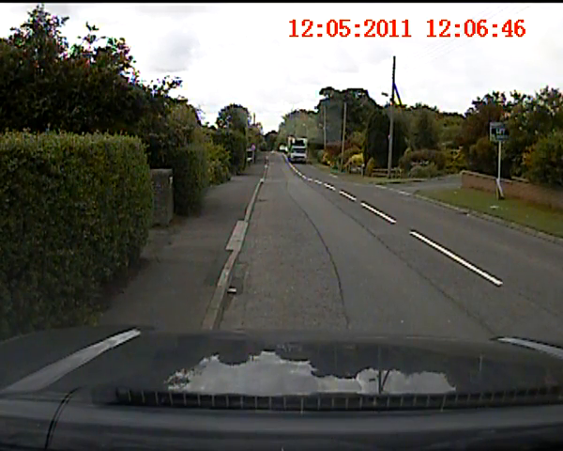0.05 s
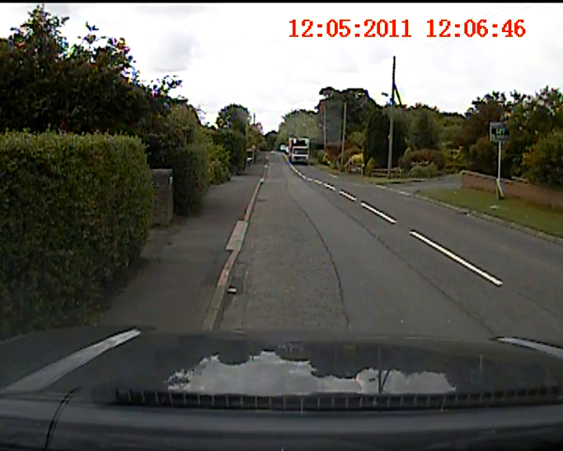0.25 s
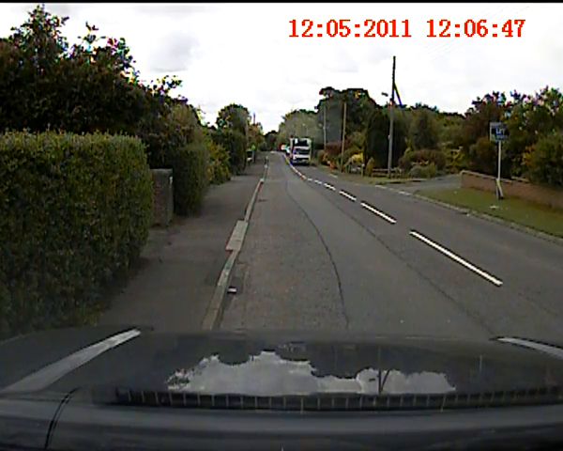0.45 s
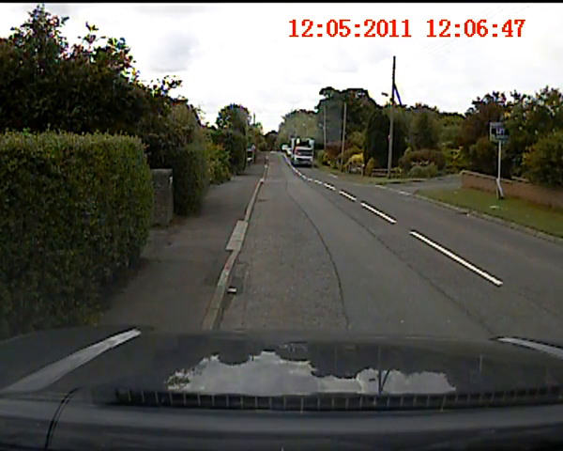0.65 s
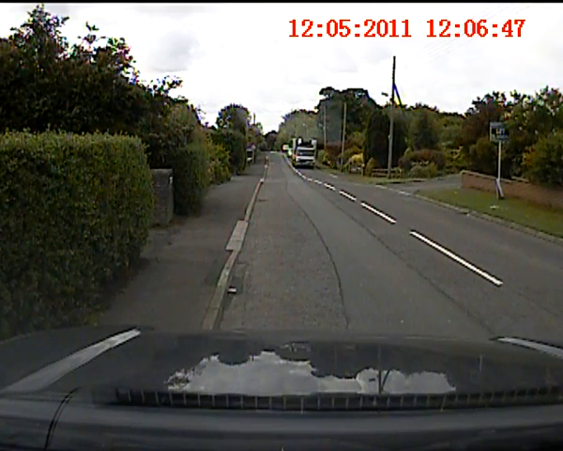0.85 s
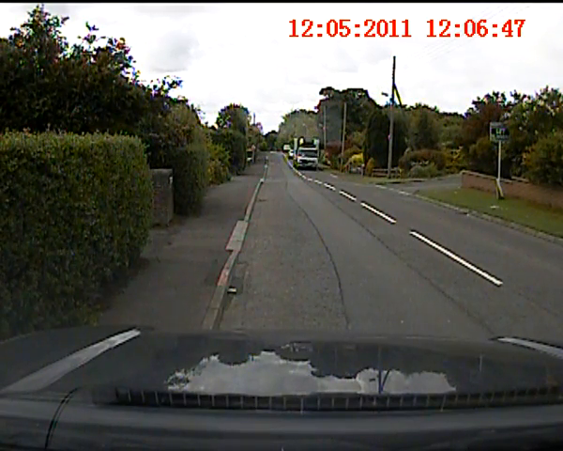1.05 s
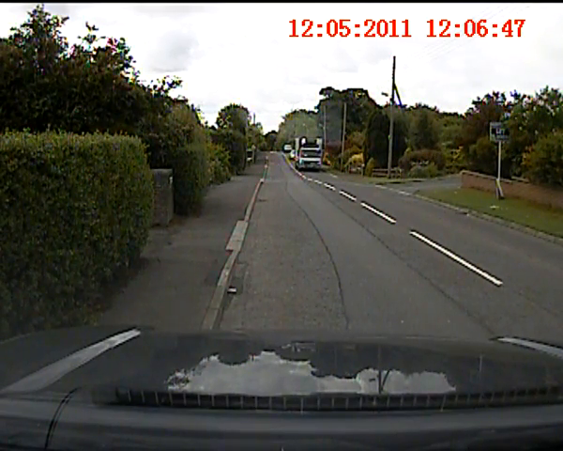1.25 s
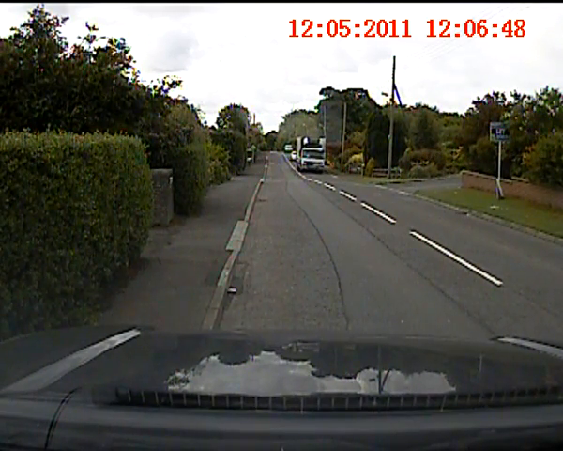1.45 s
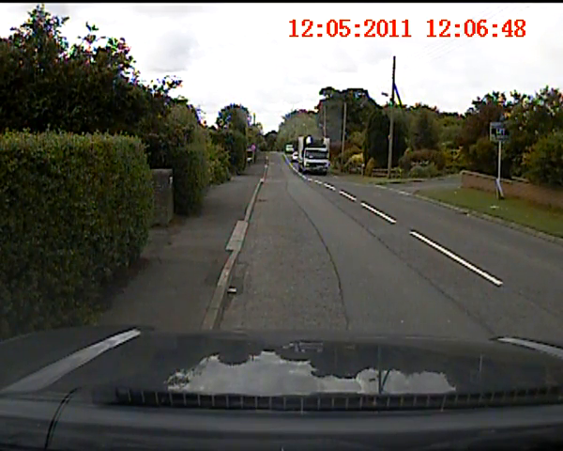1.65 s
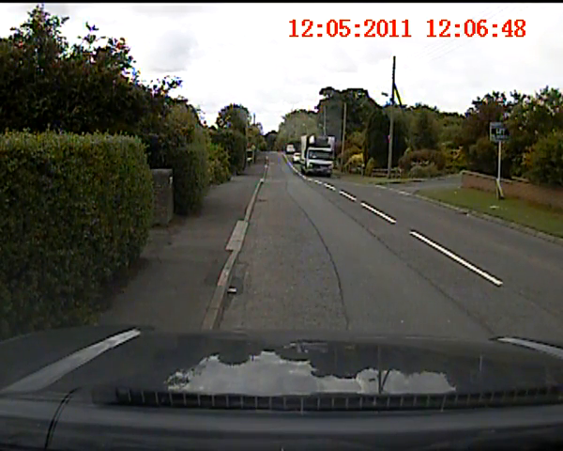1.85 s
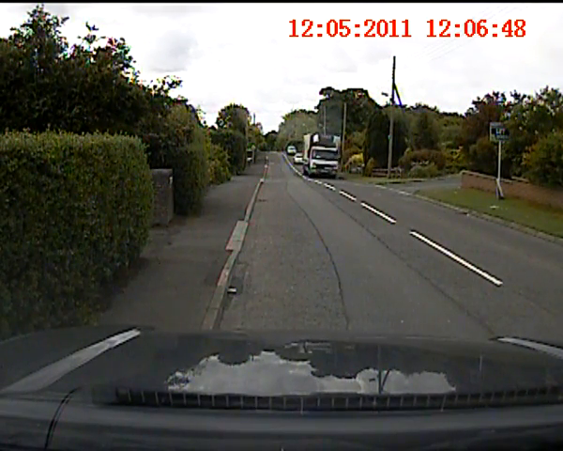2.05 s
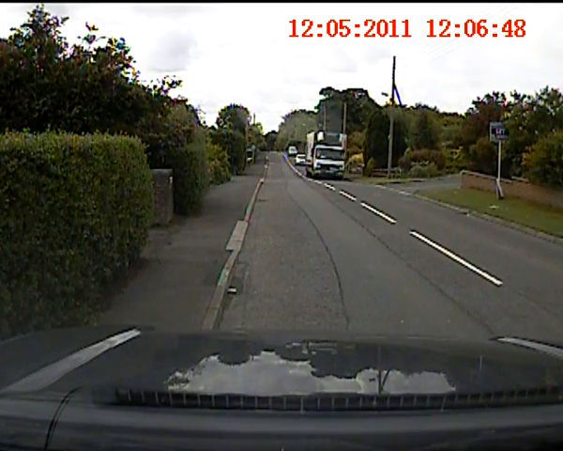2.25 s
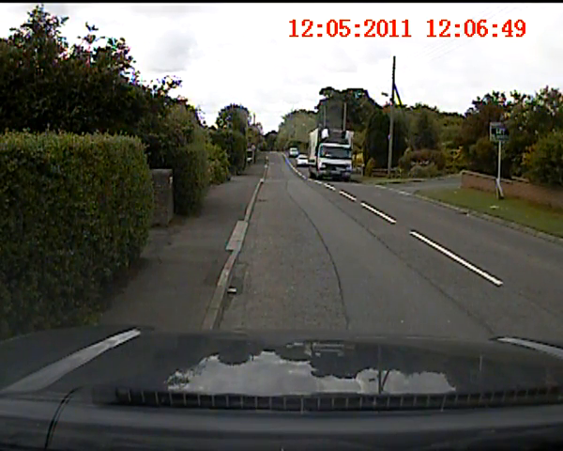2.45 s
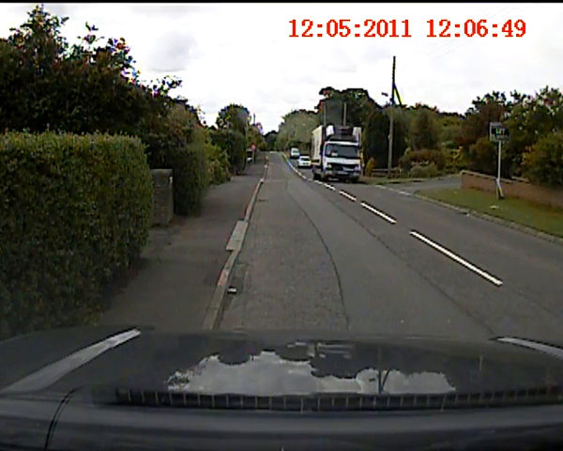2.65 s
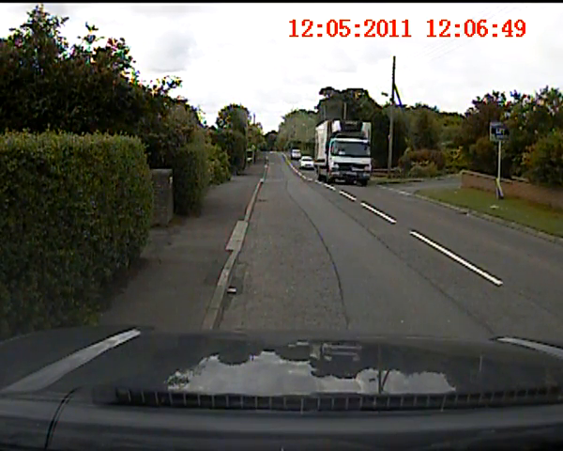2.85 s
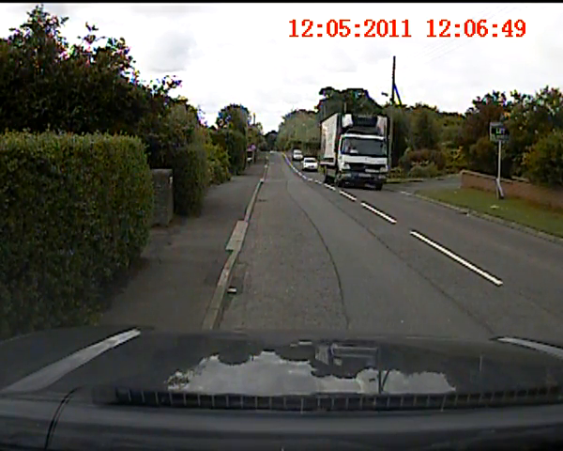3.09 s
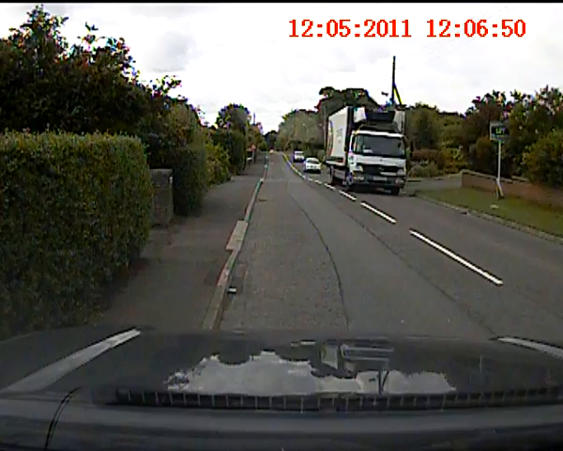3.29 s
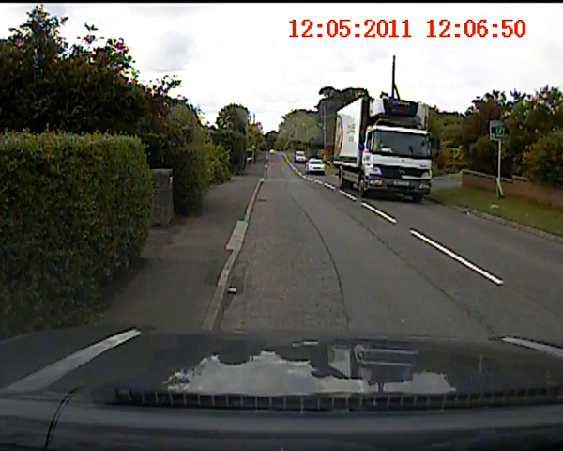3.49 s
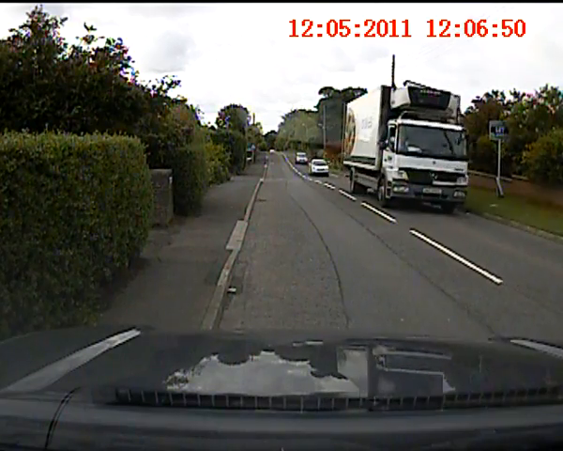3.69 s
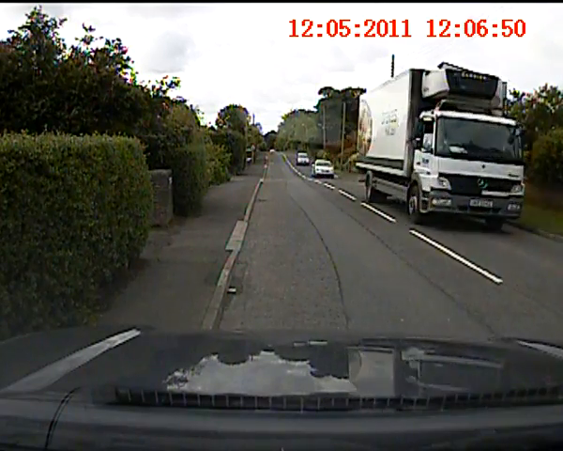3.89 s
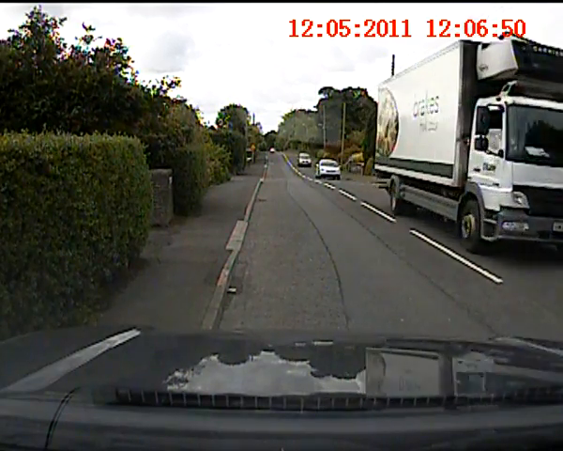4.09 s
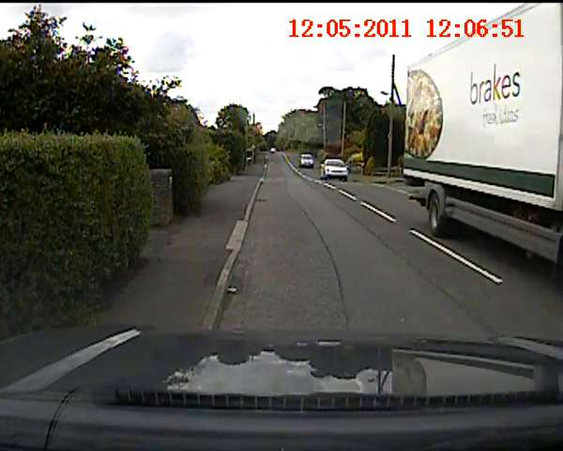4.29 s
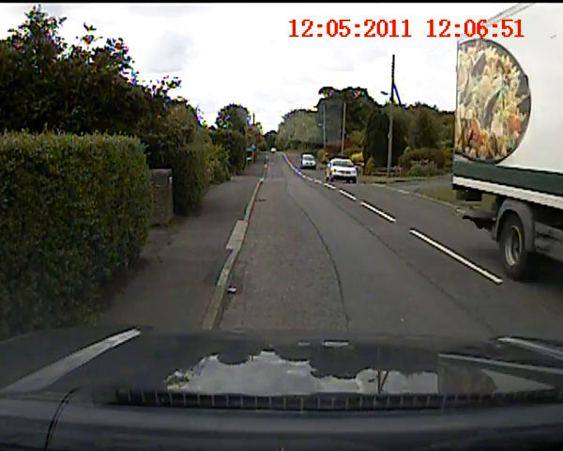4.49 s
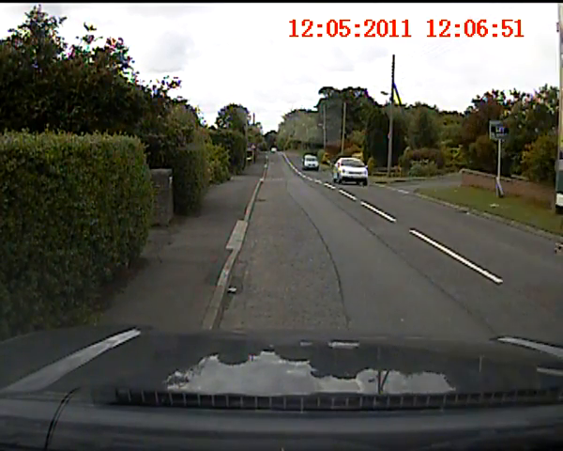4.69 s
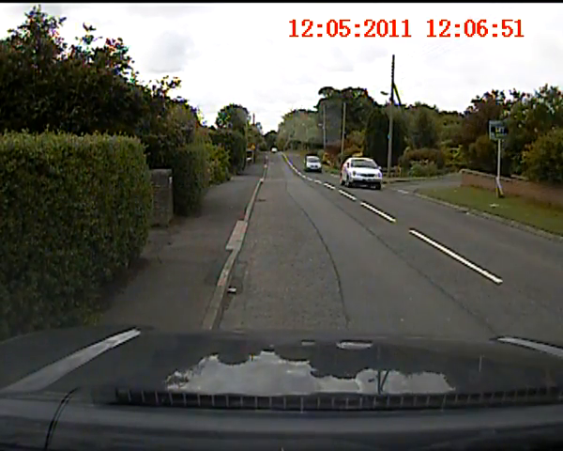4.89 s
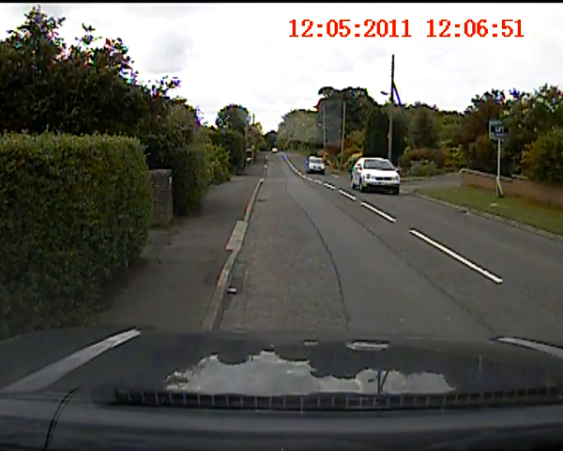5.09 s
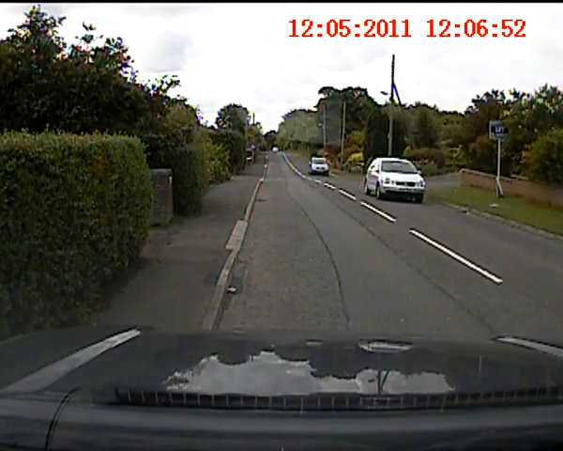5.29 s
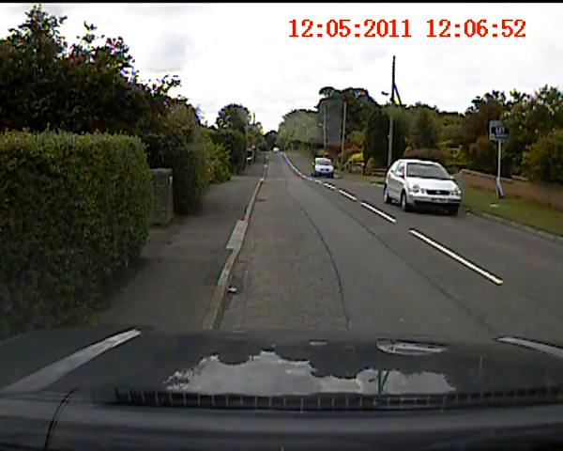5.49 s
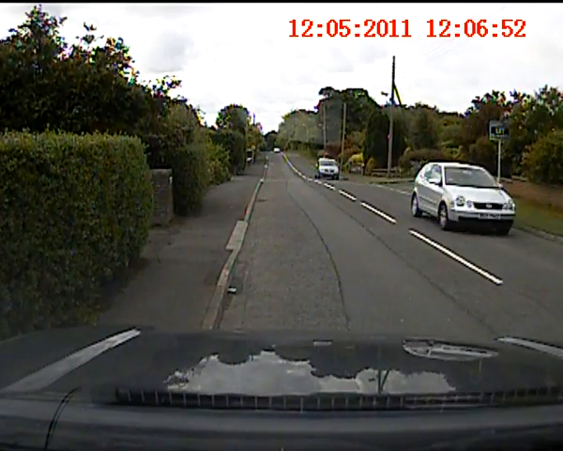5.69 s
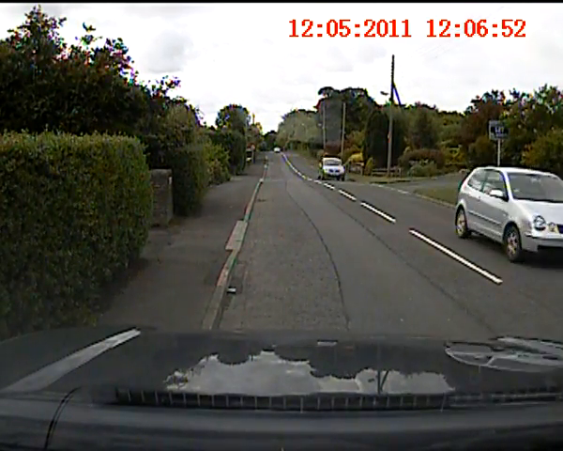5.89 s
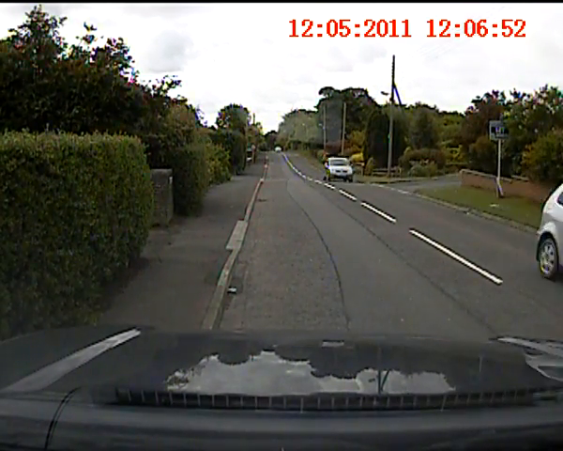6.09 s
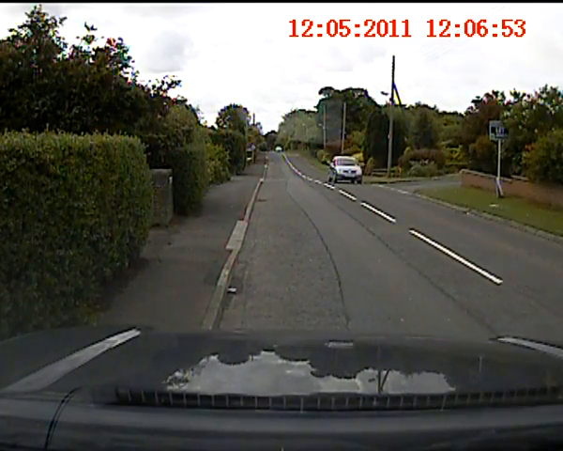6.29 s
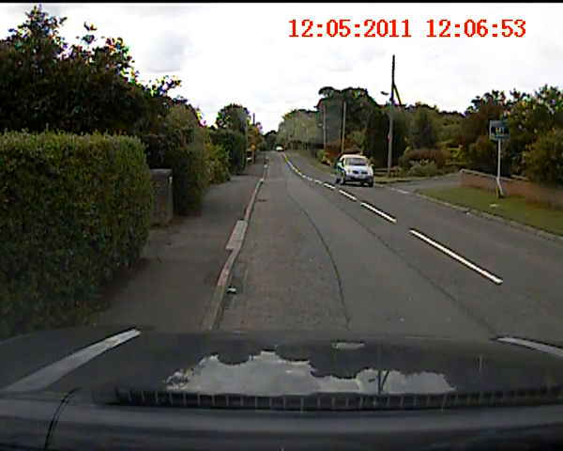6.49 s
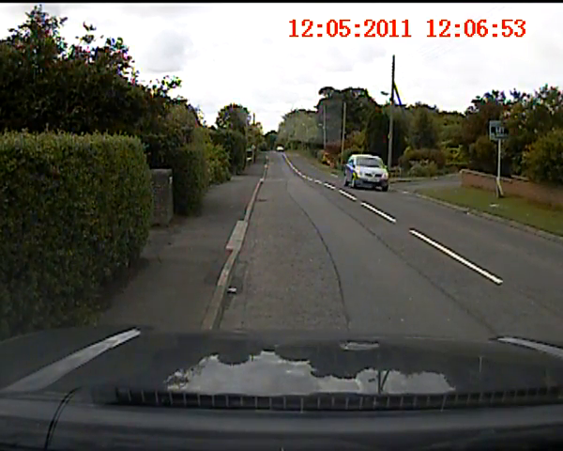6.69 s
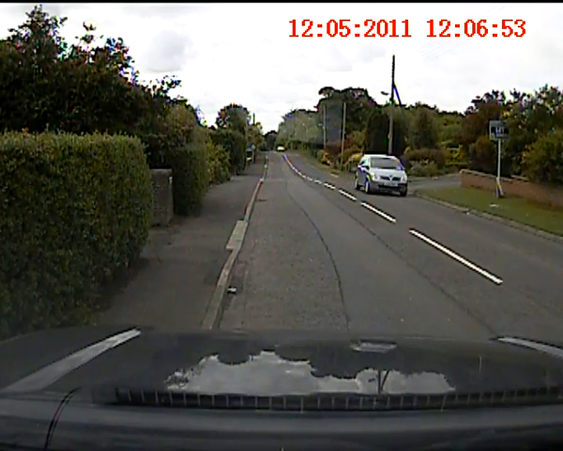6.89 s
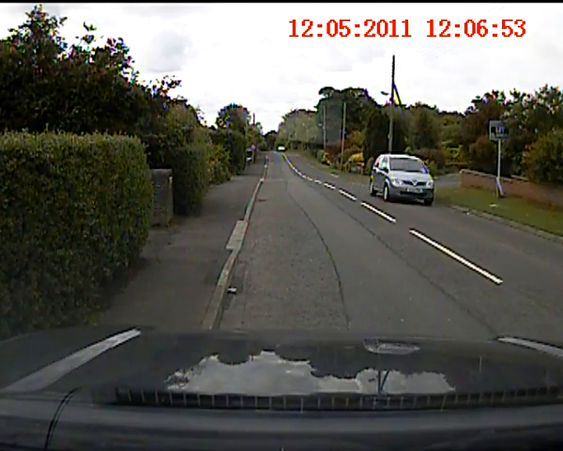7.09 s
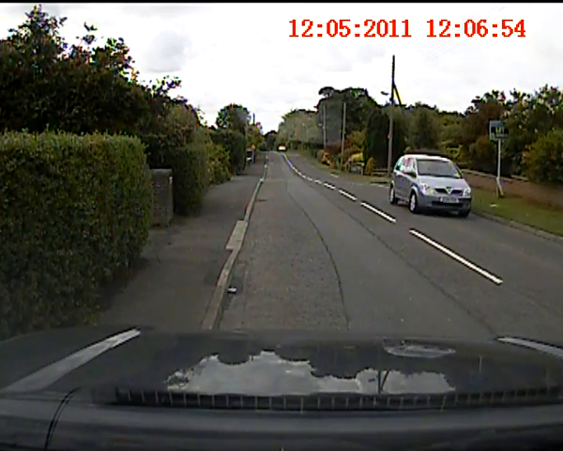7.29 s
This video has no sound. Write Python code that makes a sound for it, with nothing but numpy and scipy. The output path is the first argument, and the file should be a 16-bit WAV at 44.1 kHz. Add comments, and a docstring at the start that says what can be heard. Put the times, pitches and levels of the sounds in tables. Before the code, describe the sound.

Low engine idle in a car cabin; door clunks open, a heavy lorry rushes by, small metal rattles, and the door slams hard, distorting.

```python
"""Inside a car idling at the roadside, one small microphone: the door opens, a lorry drones past, the door slams.
Engine orders and drones are cosines; tyres, air and hiss are coloured noise, the lorry's swelling as it nears.
Dying pressure swings of the door drive the microphone into clipping; resonant bursts rattle latch and trim.
A faint electric whine, restarting many times a second, sits high above the cabin hiss."""
import sys
import numpy as np
from scipy import signal
from scipy.fft import rfft, irfft, next_fast_len
from scipy.io import wavfile
from scipy.ndimage import uniform_filter1d, map_coordinates

SR = 44100
rng = np.random.default_rng(int(sys.argv[2]) if len(sys.argv) > 2 else 0)


def volts_from_db(level):
    """Convert decibel levels to linear amplitude ratios."""
    exponent = np.asarray(level, float) / 20
    return 10 ** exponent


def store_wav(level_fs):
    """Save 16-bit WAV to argv[1]."""
    pcm = np.round(np.clip(np.atleast_2d(level_fs), -1, 1) * 32767)
    wavfile.write(sys.argv[1], SR, pcm.T.astype(np.int16))


N = 323694

# the door stands open between these times; it swings clear over OPENING_S
OPEN_S, SHUT_S, OPENING_S = 2.05, 5.63, .3
# the lorry: reference point abreast, speed, gap from its line to the microphone
PASS_S, LORRY_MS, GAP_M = 4.85, 17.5, 4.5


def unit(x):
    """Scaled to rms 1."""
    return x / np.sqrt(np.mean(x ** 2) + 1e-20)


def along(points, hz):
    """Interpolates (Hz, value) points on a log frequency axis."""
    point_hz, value = np.transpose(points)
    return np.interp(np.log(hz + 1), np.log(point_hz + 1), value)


def curves(rows):
    """One value per sample for each column after the time."""
    s, *columns = np.transpose(rows)
    return [np.interp(np.arange(N) / SR, s, column) for column in columns]


def wobble(rate):
    """A smooth random curve, rate knots a second."""
    knots = rng.standard_normal(int(N * rate / SR) + 4)
    return map_coordinates(knots, [np.arange(N) * rate / SR])


def filtered(x, response):
    """x shaped by a complex response of frequency."""
    m = next_fast_len(N + SR // 2)
    return irfft(rfft(x, m) * response(np.fft.rfftfreq(m, 1 / SR)), m)[..., :N]


def rush(spectrum, patchy_db):
    """Coloured noise of rms 1, uneven in patches of time and pitch."""
    z = signal.stft(rng.standard_normal(N), nperseg=512)[2]
    field = uniform_filter1d(rng.standard_normal(z.shape), size=6, axis=0)
    field = uniform_filter1d(field, size=10, axis=1)
    patchy = signal.istft(z * volts_from_db(patchy_db * unit(field)), nperseg=512)[1][:N]
    return unit(filtered(patchy, lambda hz: volts_from_db(along(spectrum, hz))))


def resonant(peaks):
    """Noise of rms 1 passed twice through resonances (Hz, width Hz, relative dB)."""
    def body(f):
        total = 0
        for k, (centre, width, db) in enumerate(peaks):
            # alternate signs between neighbouring resonances
            total = total + (-1) ** k * volts_from_db(db / 2) * 1j * f * width / (centre ** 2 - f * f + 1j * f * width)
        return total
    return unit(filtered(rng.standard_normal(N), lambda f: body(f) ** 2))


def tone(hz, db, start):
    """A cosine that follows a pitch and an rms level from a starting phase in radians."""
    return np.sqrt(2) * volts_from_db(db) * np.cos(2 * np.pi * np.cumsum(hz * np.ones(N)) / SR + start)


def opening():
    """How far the door stands open, 0 to 1."""
    return curves([(OPEN_S, 0), (OPEN_S + OPENING_S, 1), (SHUT_S - .2, 1), (SHUT_S - .03, .7),
                   (SHUT_S + .03, 0)])[0]


def passing(behind_m):
    """Distance along the road and straight distance to a point behind the lorry's reference point."""
    ahead = LORRY_MS * (PASS_S - np.arange(N) / SR) + behind_m
    return ahead, np.hypot(ahead, GAP_M)


def reach(db, behind_m, steep, front_db):
    """Gain from a point of the lorry through the door gap, falling with distance and tilted to the front."""
    ahead, distance = passing(behind_m)
    return opening() * volts_from_db(db + front_db * ahead / distance) * (GAP_M / distance) ** steep


def cabin():
    """Steady fan and circuit hiss, with a fuzzy fan note that is clearer while the door is open."""
    # colour of the cabin hiss: pitch_hz, relative_level_db
    cabin_colour = [(70, -34), (120, -3.5), (190, -18), (240, -7.5), (360, -13.5), (550, -15), (1340, -22),
                    (2000, -39.5), (4000, -29.5), (8000, -35), (10000, -35.5), (11700, -44.5),
                    (15000, -120)]
    shut_db, open_db = -64.5, -58
    note_db = shut_db + (open_db - shut_db) * opening() + 2.2 * wobble(25)
    note = volts_from_db(note_db) * resonant([(1725, 44, 0)])
    return volts_from_db(-44.5) * rush(cabin_colour, patchy_db=0.57) + note


def whine():
    """Electric whine whose phase restarts with a quick upward slide, over a fuzzy band of noise."""
    t = np.arange(N) / SR
    carrier_hz, restart_hz = 8686.9, 66.05
    since = t % (1 / restart_hz)
    # each slide settles 22 Hz under the carrier
    turns = carrier_hz * t - 22 * since + .38 * np.exp(-since / .0012)
    pure = volts_from_db(-56 + 0.53 * wobble(6)) * np.sqrt(2) * np.sin(2 * np.pi * turns)
    fuzz = volts_from_db(-64.5) * resonant([(8610, 260, 0)])
    return pure + fuzz


def engine():
    """Idle orders of the four-stroke cycle: multiples of the firing rate share a phase, the rest start freely."""
    # idle speed, which sags for a moment: time_s, cycle_hz
    idle_speed = [(0, 7.121), (2.19, 7.121), (2.21, 7.11), (5, 7.11), (5.3, 6.775), (5.6, 7.113),
                  (7.34, 7.12)]
    # engine orders: multiple_of_cycle, level_db before the cabin boom
    idle_orders = [(1, -12.5), (2, -11), (3, -12), (4, 0.5), (5, -13), (6, -29.5), (7, -13.5), (8, -8),
                   (9, -25), (10, -35), (11, -32.5), (12, -28.5), (13, -28.5), (14, -26.5), (15, -47.5),
                   (16, -30.0), (17, -29.5), (18, -41.5), (19, -34.5), (20, -32), (21, -48), (22, -43.5),
                   (23, -46.5), (24, -48.5), (25, -45), (26, -53), (27, -52.5), (28, -50), (29, -40.5),
                   (30, -45), (31, -52), (32, -42.5), (70, -46.0), (75, -49.0), (80, -47)]
    # boom of the idle in the cabin: time_s, gain_db
    boom_curve = [(0, -19), (3.2, -18), (4.5, -14.5), (5.5, -13), (6.3, -18), (7.34, -18)]
    firing_angle = 2.18  # radians
    speed, = curves(idle_speed)
    boom_db, = curves(boom_curve)
    orders = np.zeros(N)
    for k, db in idle_orders:
        start = firing_angle + (k % 4 > 0) * rng.uniform(0, 2 * np.pi)
        orders += tone(k * speed, db + 0.25 * wobble(6.1), start)
    return volts_from_db(boom_db) * orders


def buffeting():
    """Slow air rocking the cabin: very low noise that rises and falls."""
    # strength of the air: time_s, level_db
    buffet_curve = [(0, -44), (2.25, -37), (2.45, -29), (3, -31.5), (3.4, -22.5), (5.4, -17.5),
                    (5.6, -33.5), (6.3, -25.5), (7, -56), (7.34, -10)]
    # colour of the air: pitch_hz, relative_level_db
    air_colour = [(2, -120), (5, -8.5), (16, 2), (30, -5.5), (70, -15), (110, -120)]
    return volts_from_db(curves(buffet_curve)[0]) * rush(air_colour, patchy_db=2.9)


def road():
    """Lorry tyres and far traffic as rumble, roar and hiss; the shut door muffles the road at once."""
    # colours of the three bands: pitch_hz, relative_level_db
    rumble_colour, roar_colour, hiss_colour = [(44, -41.5), (75, -1.5), (113, -14), (199, -14),
                                               (231, -20.5), (300, -21), (390, -54.5), (660, -120)], [(150, -34), (250, -6.5), (348, -3.5),
                                                               (388, -2), (482, -3), (569, -4), (742, -5.5),
                                                               (804, -4), (1400, -18.5), (1820, -46),
                                                               (3080, -120)], [(760, -20.5), (1300, -14),
                                                                             (1400, -7), (1610, -1),
                                                                             (1790, -3), (2080, -2),
                                                                             (3030, -5), (3320, -7),
                                                                             (3810, -9.5), (5150, -11.5),
                                                                             (5920, -16.5), (6420, -15.5),
                                                                             (7310, -16.5), (9620, -17.5),
                                                                             (11700, -21), (15200, -64),
                                                                             (22000, -120)]
    # resonant bands of the passing tyres: pitch_hz, width_hz, relative_level_db
    tread_bands = [(1612, 160, -2), (2200, 300, 0), (3800, 210, -8), (5150, 75, -6.5), (6480, 300, -12.5),
                   (8080, 160, -15.5), (8480, 220, -11), (9740, 710, -15)]
    # lorry tyres as rumble, roar, hiss: abreast_db, behind_m, steepness of the fall with distance, front_db
    tyre_reach = [(-17.5, .2, 1.46, 2), (-20.5, 2.2, 1.44, -0.5), (-30, 2.6, 1.41, -2)]
    # front wheel, whose hiss comes round the windscreen only near abreast: columns as for the tyres
    front_wheel = (-29.5, -0.03, 4.5, -1)
    # far traffic as rumble, roar, hiss: before_opening_db, while_open_db, after_shutting_db
    far_traffic = [(-44, -38.5, -34.5), (-57, -45.5, -46.5), (-52.5, -48, -51.5)]
    # low surges in the rumble: centre_s, peak_db, half_length_s (down to 1/e)
    low_surges = [(2.12, -34, 0.062), (2.95, -35.5, 0.11), (3.27, -33, .07), (4.9, -18.5, 0.072),
                  (5.24, -18.5, .04), (7, -30, .03), (7.1, -26, .06), (7.236, -18, 0.029), (7.34, -19, .03)]
    t = np.arange(N) / SR
    door_gap = opening()
    levels = []
    for near, (before, during, after) in zip(tyre_reach, far_traffic):
        shut_db = np.where(t < SHUT_S - 1, before, after)
        far = volts_from_db(door_gap * during + (1 - door_gap) * shut_db)
        levels.append(np.hypot(reach(*near), far))
    low, middle, high = levels
    high = np.hypot(high, reach(*front_wheel))
    for s, db, half in low_surges:
        low = low + volts_from_db(db) * np.exp(-((t - s) / half) ** 2)
    rumble = low * volts_from_db(2.1 * wobble(12)) * rush(rumble_colour, patchy_db=1.5)
    # hollow band of the wheel arches
    arch_level = reach(-34, behind_m=1.5, steep=1, front_db=0) * volts_from_db(2.0 * wobble(5))
    arch = arch_level * resonant([(778, 140, 0)])
    roar = volts_from_db(0.6 * wobble(15)) * (middle * rush(roar_colour, patchy_db=1.84) + arch)
    bands = unit(rush(hiss_colour, patchy_db=1.13) + volts_from_db(-8.0) * resonant(tread_bands))
    hiss = high * volts_from_db(0.44 * wobble(20)) * bands
    return rumble + roar + hiss


def lorry():
    """Low tones of a big engine slide down together as it passes; softer ones go on behind the shut door."""
    # lorry tones: pitch_ratio to the firing rate, abreast_db, behind_m, steepness of the fall, front_db
    drone_rows = [(1, -11, -4, 1.02, 0), (.565, -13, 1.5, 1.23, 6), (.82, -17, 8, 0.56, 0),
                  (3, -23, .4, 2.07, 0), (2.65, -29, .4, 2, 0.5), (5.93, -31.5, 4, 2.2, 0)]
    # the firing tone also leaves by the tail pipe: abreast_db, behind_m, steepness of the fall, front_db
    tail_pipe = (-7.5, 7, 2, 0)
    # following cars through the shut door: pitch_ratio to the lorry's sliding firing rate, level_db
    following_cars = [(0.99, -30), (.565, -32), (.82, -34.5)]
    firing_hz, sound_ms = 68.3, 343
    ahead, distance = passing(0)
    hz = firing_hz * (1 + LORRY_MS / sound_ms * ahead / distance)  # Doppler slide

    def hum(ratio):
        pitch = hz * ratio * (1 + .003 * wobble(6))
        return tone(pitch, 0.9 * wobble(7), rng.uniform(0, 2 * np.pi))

    gains = [reach(*row) for _, *row in drone_rows]
    gains[0] = np.hypot(gains[0], reach(*tail_pipe))
    drones = sum(gain * hum(row[0]) for gain, row in zip(gains, drone_rows))
    shut = (1 - opening()) * (np.arange(N) > SHUT_S * SR)
    return drones + shut * sum(volts_from_db(db) * hum(ratio) for ratio, db in following_cars)


def knocks():
    """Each contact is a dying burst of resonant noise shared out over metal, latch and trim."""
    # colours of small metal, latch and trim: pitch_hz, width_hz, relative_level_db
    jingle_bands, clack_bands, thump_bands = [(4500, 1240, -11.5), (5240, 600, 2), (6590, 1000, -2.5),
                                              (8130, 660, 2), (8920, 560, -1), (10500, 870, -2.5)], [(990, 170, 5), (1724, 450, 0), (2350, 240, 6),
                                                              (2930, 390, 1), (3580, 500, 0.5),
                                                              (4380, 860, -4)], [(131, 60, 9), (351, 89, 1),
                                                                             (570, 65, -1),
                                                                             (812, 100, -2.5),
                                                                             (1061, 110, -7)]
    # rattles of small metal on the latch: start_s, jingle_db, clack_db
    rattle_rows = [(2.052, -48, -42), (3.075, -51, -41), (3.092, -42.5, -44), (3.105, -42.5, -40),
                   (3.127, -48, -51), (3.704, -39.5, -31), (3.73, -46, -48), (3.915, -44.5, -54),
                   (4.084, -30, -32.5), (4.12, -42, -47), (4.15, -43, -45), (4.18, -44, -48),
                   (4.301, -30.5, -37), (4.355, -30.5, -40), (4.398, -34, -39), (4.453, -33, -40),
                   (5.151, -34, -27), (5.772, -37, -35), (6.28, -45, -55), (6.618, -28, -38.5),
                   (6.691, -53, -44.5)]
    # thumps on the trim: start_s, thump_db, clack_db, t60_s
    thump_rows = [(2.089, -25.5, -35, 0.093), (2.49, -33.5, -51, .12), (2.74, -37.5, -54.5, .12),
                  (3.128, -26.5, -41, 0.086), (3.239, -30.5, -50, .14), (3.704, -33, -50, .07),
                  (4.084, -26.5, -41.5, .12), (5.151, -21, -43, .07), (5.265, -27, -41, 0.18),
                  (5.713, -33, -36.5, 0.094), (5.772, -28, -40, .17), (5.838, -29, -42.5, .19),
                  (6.14, -34, -60, .12), (7.057, -30.5, -46, .2), (7.09, -33, -49, .11),
                  (7.222, -19.5, -38.5, .11), (7.239, -20, -37, .074), (7.254, -22, -47, 0.072),
                  (7.315, -24, -48, 0.11)]
    # the latch catches: start_s, jingle_db, clack_db, thump_db, t60_s, rise_s
    latch_catch = (5.673, -28, -19, -31, 0.04, .0009)
    contacts = [latch_catch]
    for s, jingle, clack in rattle_rows:
        contacts.append((s, jingle, clack, -120, .07, .0017))
    for s, thump, clack, t60 in thump_rows:
        # a thump shakes the small metal a little, 13.5 dB under its clack
        contacts.append((s, clack - 13.5, clack, thump, t60, .0039))
    shape = np.zeros((3, N + SR))
    t = np.arange(SR // 2) / SR
    for s, *levels, t60, rise in contacts:
        burst = volts_from_db(-60 * t / t60) * (1 - np.exp(-t / rise))
        begin = round(s * SR)
        shape[:, begin:begin + len(t)] += volts_from_db(levels)[:, None] * burst / burst.max()
    grit = volts_from_db(1.6 * wobble(250))  # loose parts chatter within a burst
    bands = (jingle_bands, clack_bands, thump_bands)
    return sum(grit * envelope[:N] * resonant(peaks) for envelope, peaks in zip(shape, bands))


def door():
    """Opening and slamming set cabin air and body panels in slow dying swings; the door bounces on its seal."""
    # swings of cabin pressure: start_s, level_db before the rise, pitch_hz, t60_s, rise_s,
    # sign (+1 squeeze, -1 suction)
    pressure_swings = [(2.0894, 9.3, 7.39, .424, .0427, 1), (2.1524, 2.8, 12.97, .54, .0033, -1),
                       (5.6008, 21.46, 2.14, .606, .0256, -1), (5.6742, 27.72, 5.12, .353, .0048, 1),
                       (5.7, 15.52, 22.35, 1.237, .0793, 1), (5.711, 22.37, 23.33, .408, .046, -1),
                       (5.7337, 7.8, 36.18, .364, .0021, -1)]
    # bounces on the seal: start_s, level_db before the rise, sign (+1 squeeze, -1 suction)
    seal_bounces = [(5.7708, 8, 1), (5.7848, 9.5, -1), (5.8145, 10, 1)]
    # every bounce swings alike: pitch_hz, t60_s, rise_s
    bounce_swing = (5, .047, .0033)
    bounces = [(s, db, *bounce_swing, sign) for s, db, sign in seal_bounces]
    out = np.zeros(N)
    for s, db, hz, t60, rise, sign in [*pressure_swings, *bounces]:
        t = np.maximum(np.arange(N) / SR - s, 0)
        envelope = volts_from_db(db - 60 * t / t60) * (1 - np.exp(-t / rise))
        out += sign * envelope * np.cos(2 * np.pi * hz * t)
    return out


def scene():
    """All sources at the one microphone."""
    background = cabin() + whine() + engine() + buffeting() + road()
    return (background + lorry() + knocks() + door())[None]


def low_pass(x):
    """Removes everything above the highest recorded frequency."""
    return signal.sosfilt(signal.butter(12, 11820, fs=SR, output="sos"), x)


def record(dry):
    """The microphone input clips flat at its rails, then loses its highest treble."""
    # treble roll-off: pitch_hz, gain_db
    treble_rolloff = [(20, 0), (9800, -1), (10700, -7.5), (11500, -10), (12200, -32.5), (13000, -120)]
    rail = 1 / np.sqrt(2)  # of full scale
    clipped = np.clip(dry, -rail, rail)
    mix = filtered(clipped, lambda hz: volts_from_db(along(treble_rolloff, hz)))
    return low_pass(mix)


dry = scene()
out = record(dry)
store_wav(out)
```